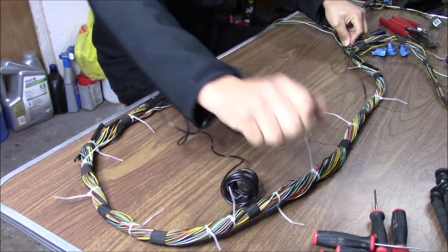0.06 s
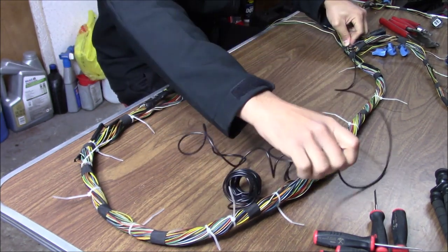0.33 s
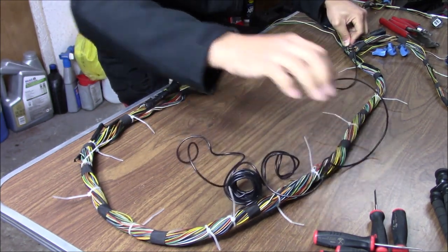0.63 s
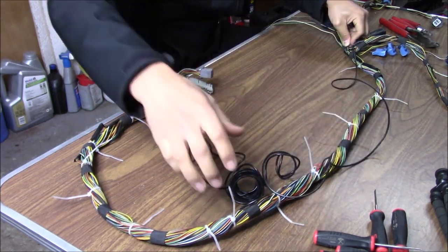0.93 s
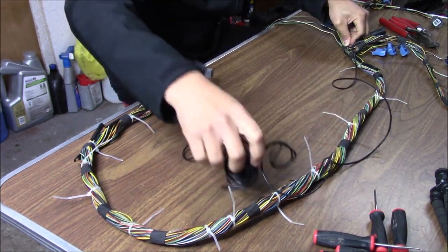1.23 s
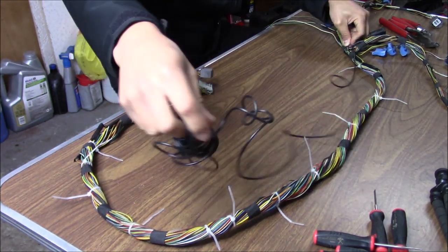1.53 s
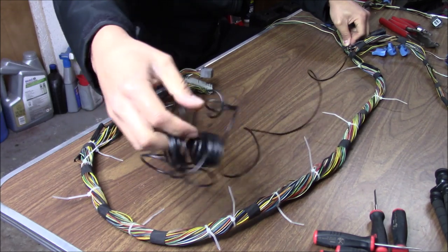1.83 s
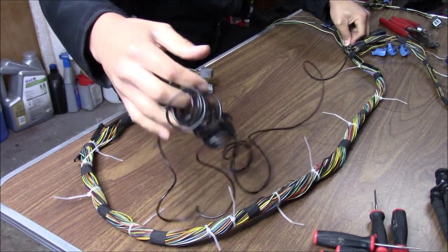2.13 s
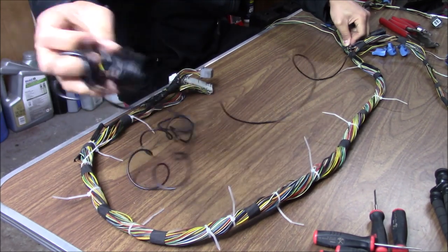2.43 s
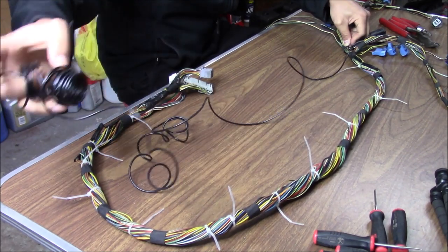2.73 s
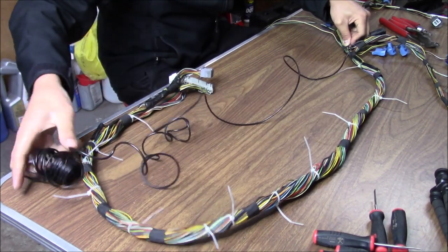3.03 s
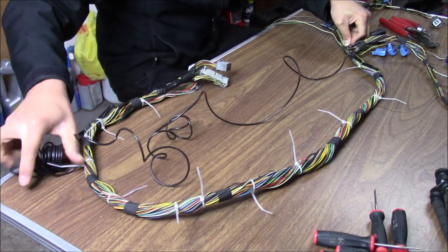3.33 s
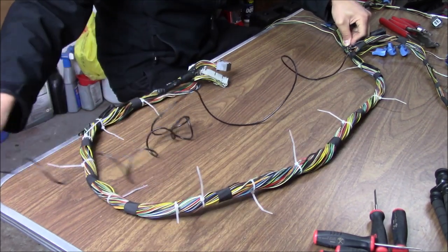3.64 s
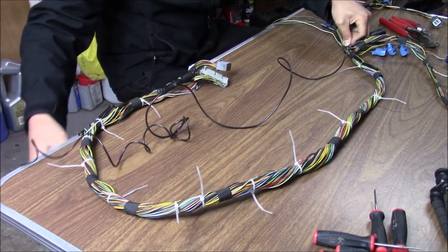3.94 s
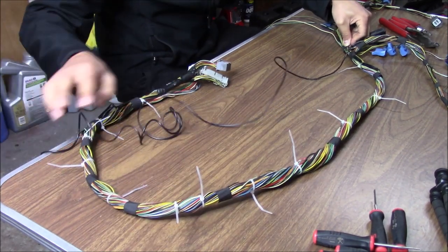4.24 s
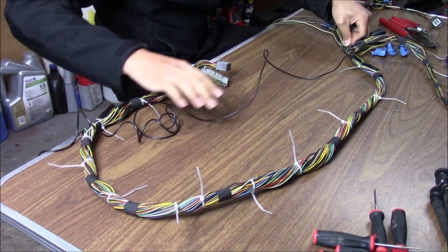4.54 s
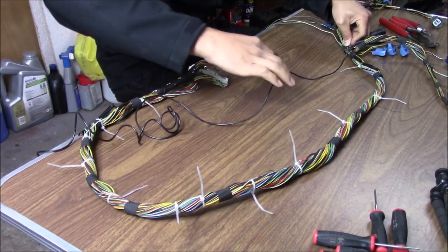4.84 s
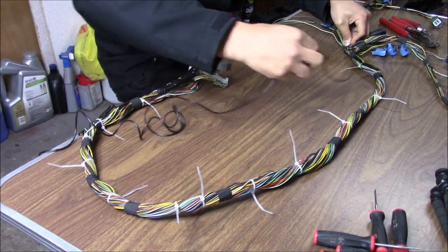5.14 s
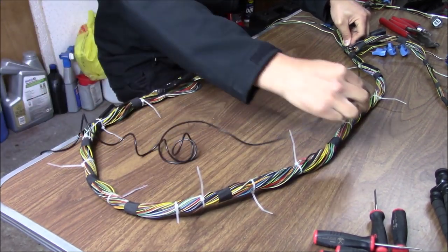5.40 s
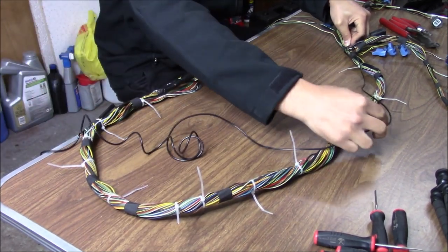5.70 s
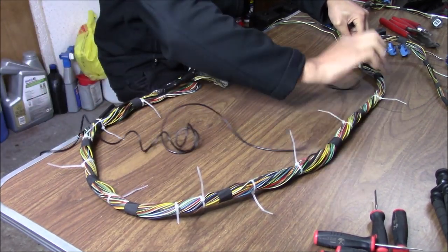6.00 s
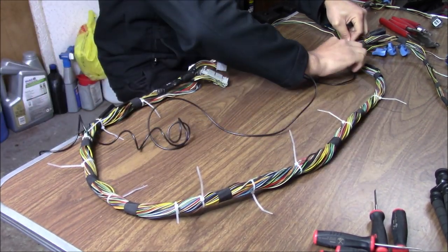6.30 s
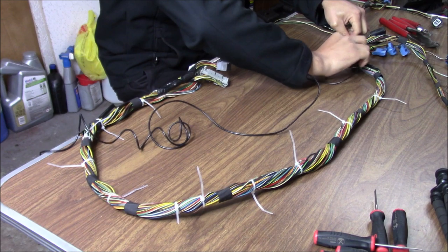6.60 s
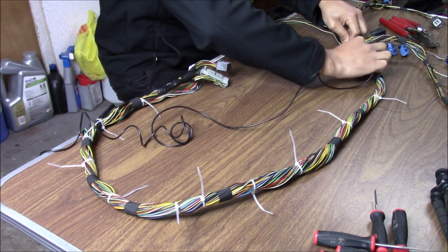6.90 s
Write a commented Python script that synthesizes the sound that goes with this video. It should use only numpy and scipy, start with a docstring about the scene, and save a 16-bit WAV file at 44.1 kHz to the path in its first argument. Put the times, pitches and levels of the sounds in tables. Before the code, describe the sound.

In a small, quiet workshop, someone handles a coil of wire on a wooden tabletop. A quick whipping slap comes first, followed by a dull thump, scattered clicks and short rustling slides. Midway the coil drags and judders, then clinks brightly against a hard object. Softer wire ticks and jacket brushes fill the rest. The microphone picks up a little room reverberation, almost in mono.

```python
"""Coiled wire on a wooden table

Hands move a coil of insulated wire about a wiring harness in a small workshop. Its loops and free end
strike the tabletop and excite its modes; wire, coil and a jacket sleeve rub by stick-slip friction.
The coil knocks, drags over the harness and drops over the edge against something hard that clinks.
Table, reverberation and room tone are heard nearly in mono."""
import sys
import numpy as np
from scipy import signal
from scipy.fft import rfft, irfft
from scipy.io import wavfile

SR = 44100
rng = np.random.default_rng(int(sys.argv[2]) if len(sys.argv) > 2 else 0)


def dump(signal):
    """Clip the signal to [-1, 1] and save it as 16-bit WAV at the path in sys.argv[1]."""
    limited = np.clip(np.atleast_2d(signal).T, -1, 1)
    pcm = np.round(limited * 32767).astype(np.int16)
    wavfile.write(sys.argv[1], SR, pcm)


N = 311346

# modes of the tabletop: (frequency [Hz], relative level [dB], decay time T60 [s])
TABLETOP_MODES = [(210, 7, 0.14), (224.3, -17, 0.083), (366, 6, 0.38), (493.5, 4, 0.34), (621, 1, 0.35),
                  (700, -15.5, 0.063), (846, 8, 0.14), (1031, 2, 0.06)]


def amp(db):
    """Amplitude ratio of a level in decibels."""
    return 10 ** (np.asarray(db) / 20)


def unit(x):
    """Normalisation to rms 1."""
    return x / np.sqrt(np.mean(x ** 2) + 1e-20)


def read(points, hz):
    """Interpolation on a log-frequency axis."""
    f, value = np.transpose(points)
    return np.interp(np.log(hz + 1), np.log(f + 1), value)


def add(mix, s, sound):
    """Superposition of a stereo sound, starting at s seconds."""
    part = mix[:, max(round(s * SR), 0):][:, :sound.shape[1]]
    part += sound[:, :part.shape[1]]


def room_tone():
    """Stationary noise, partly coherent between left and right."""
    # noise spectrum: (frequency [Hz], relative level [dB])
    colour = [(12, -60.5), (20, -27.5), (86, -7.5), (177, -4), (255, -6), (277, -3), (542, -6.5),
              (1220, -12.5), (1370, -9), (1960, -16), (4670, -21), (5230, -22.5), (8890, -27.5),
              (12400, -32), (16000, -41)]
    # likeness of the channels: (frequency [Hz], correlation [0-1])
    coherence = [(25, 0.89), (100, 0.81), (1000, 0.56), (4000, 0.73), (9000, 0.94), (14000, 0.95)]
    hz = np.fft.rfftfreq(N, 1 / SR)
    left, independent = rfft(rng.standard_normal((2, N)))
    same = read(coherence, hz)
    right = same * left + np.sqrt(1 - same ** 2) * independent
    return amp(-56) * unit(irfft(np.array([left, right]) * amp(read(colour, hz)), N))


def room(size=26000):
    """Reverberation: dense reflections decay exponentially, each band at its own rate."""
    # reverberation time: (frequency [Hz], T60 [s])
    decay = [(150, 0.27), (400, 0.5), (1040, 0.41), (2760, 0.47), (7280, 0.4), (14000, .3)]
    # spectrum of the reflections: (frequency [Hz], gain [dB])
    colour = [(100, 6), (400, 3.5), (1500, 1.5), (4000, 3.5), (8000, -0.5), (11000, 0), (15000, -12.5)]
    # their stereo spread: (frequency [Hz], side over mid [dB])
    width = [(100, -27), (400, -34.5), (1200, -43), (2400, -21), (5000, -14), (9000, -10.5), (12000, -9.5)]
    hz, t, bands = signal.stft(rng.standard_normal((2, size)), SR, nperseg=256)
    t60 = read(decay, hz)[:, None]
    equal_energy = np.sqrt(np.log(1e6) / (t60 * SR))
    bands = bands * amp(read(colour, hz)[:, None] - 60 * t / t60) * equal_energy
    bands[1] *= amp(read(width, hz))[:, None]
    build_up = np.minimum(np.arange(size) / (0.0027 * SR), 1)
    mid, side = signal.istft(bands, SR, nperseg=256)[1][:, :size] * build_up
    return np.array([mid + side, mid - side])


def pulse(colour, bass_db=0, treble_db=0, bass_hz=600, treble_hz=3500, size=2048):
    """Minimum-phase contact pulse: heavier contacts carry more bass, harder ones more treble."""
    hz = np.fft.rfftfreq(size, 1 / SR)
    bass_shelf = bass_db / (1 + (hz / bass_hz) ** 4)
    treble_shelf = treble_db / (1 + (treble_hz / (hz + 1)) ** 4)
    db = read(colour, hz) + bass_shelf + treble_shelf
    log_gain = np.log(amp(np.r_[db, db[-2:0:-1]]))
    return np.fft.ifft(np.exp(np.conj(signal.hilbert(log_gain)))).real[:size // 2]


def strokes(rows, flatness, sag_db, jerk_db, jerk_hz=25):
    """Amplitude envelope of rubbing: flat-topped bells, sagging as the uneven hand eases its pressure."""
    t = np.arange(N) / SR
    level = np.zeros(N)
    for middle, length, db in rows:
        along = np.clip(2 * (t - middle) / length, -4, 4)
        level += np.exp(-abs(along) ** flatness) * amp(db - sag_db * along)
    knots = np.arange(400) / jerk_hz
    unevenness = np.interp(t, knots, rng.standard_normal(len(knots)))
    return level * amp(jerk_db * unevenness)


def friction(level, colour, slips_per_s, spread_db, wet_db):
    """Stick-slip friction: a Poisson stream of tiny clicks of uneven size, heard through the room."""
    sizes = amp(spread_db * np.minimum(rng.exponential(1, N), 4)) * rng.standard_normal(N)
    slips = unit(sizes * (rng.random(N) < slips_per_s / SR))
    path = amp(wet_db) * room()
    path[:, 0] += 1  # direct sound
    path = signal.fftconvolve(path, pulse(colour)[None], axes=1)
    return signal.fftconvolve((slips * level)[None], path / np.linalg.norm(path[0]), axes=1)[:, :N]


def struck(modes, ring_db, chatter_db, chatter_s, size=10000):
    """Impulse response of a body: a direct spike, damped modes and brief contact chatter."""
    t = np.arange(size) / SR
    ring = sum(amp(db) * 1e-3 ** (t / t60) * np.sin(2 * np.pi * (hz * t + rng.random()))
               for hz, db, t60 in modes)
    ring *= amp(ring_db) / np.linalg.norm(ring)
    chatter = rng.standard_normal(size) * np.exp(-t / chatter_s)
    chatter *= amp(chatter_db) / np.linalg.norm(chatter)
    return (t == 0) + ring + chatter


def blows(rows, colour, modes, ring_db, chatter_db, chatter_s, wet_db, bass_hz, treble_hz):
    """Impacts by convolution: each pulse lands on another spot, with its own body and room response."""
    out = np.zeros((2, N))
    attack = SR // 40  # a blow's level is the rms of its first 25 ms
    for s, db, bass_db, treble_db in rows:
        body = struck(modes, ring_db, chatter_db, chatter_s)
        path = amp(wet_db) * room()
        add(path, 0, np.array([body, body]))
        push = pulse(colour, bass_db, treble_db, bass_hz, treble_hz)
        sound = signal.fftconvolve(path, push[None], axes=1)
        add(out, s, amp(db) * sound / np.sqrt(np.mean(sound[:, :attack] ** 2)))
    return out


def sleeve_brushes():
    """Cloth friction: a jacket sleeve hisses as the arm reaches."""
    # strokes: (centre time [s], duration [s], level [dB])
    rows = [(1.33, 0.14, -58.5), (1.54, 0.14, -53), (4.65, 0.1, -69.5), (5.22, 0.27, -60.5), (6.4, 1, -70)]
    # slip spectrum: (frequency [Hz], relative level [dB])
    colour = [(100, -2), (1000, 7), (4500, 0.5), (6500, -1), (9700, 1), (12500, -6), (16000, -19.5)]
    level = strokes(rows, flatness=3.4, sag_db=2.5, jerk_db=2.0)
    return friction(level, colour, slips_per_s=12000, spread_db=6.0, wet_db=-1.5)


def wire_slides():
    """Sliding friction: the insulation of loose loops sticks and slips on the wood."""
    # strokes: (centre time [s], duration [s], level [dB])
    rows = [(.28, 0.29, -48.5), (.405, 0.053, -38.5), (1.1, 0.38, -51), (1.555, 0.17, -44),
            (2.21, 0.3, -44.5), (3.22, 0.096, -53), (3.41, 0.073, -44), (3.61, 0.16, -42.5),
            (3.87, 0.084, -47), (4.01, 0.063, -46.5), (4.24, 0.082, -52), (4.99, 0.15, -53.5),
            (5.22, 0.21, -45), (6.01, 0.25, -45.5), (6.32, 0.82, -61.5), (6.78, 0.18, -54),
            (7.0, .08, -62.5)]
    # slip spectrum: (frequency [Hz], relative level [dB])
    colour = [(50, -69), (120, -7), (244, -23.5), (335, 0.5), (583, -1.5), (850, 2.5), (1300, -1),
              (2000, -4), (3200, -10.5), (4870, -19), (9020, -19.5), (12100, -25.5), (16000, -30)]
    level = strokes(rows, flatness=4.4, sag_db=0.9, jerk_db=1.35)
    return friction(level, colour, slips_per_s=6000, spread_db=1.0, wet_db=-3.0)


def coil_judders():
    """Slow stick-slip: the coil's turns judder on the tabletop, which resonates with a hollow boom."""
    # strokes: (centre time [s], duration [s], level [dB])
    rows = [(.562, .04, -50.5), (1.092, 0.053, -36), (1.352, 0.036, -49.5), (3.138, 0.11, -33),
            (3.405, 0.036, -42.5), (3.465, 0.047, -36)]
    # slip spectrum: (frequency [Hz], relative level [dB])
    colour = [(50, -45), (130, -19), (250, -11), (350, -0.5), (450, -2), (570, -3), (700, -14.5),
              (880, -13.5), (1200, -18), (3000, -28.5), (15000, -44)]
    level = strokes(rows, flatness=6, sag_db=1.5, jerk_db=0.7)
    return friction(level, colour, slips_per_s=800, spread_db=0.4, wet_db=-3.5)


def coil_drags():
    """Dense stick-slip: the whole coil scrapes over the harness."""
    # strokes: (centre time [s], duration [s], level [dB])
    rows = [(3.032, 0.057, -29.5), (3.105, 0.093, -33.5)]
    # slip spectrum: (frequency [Hz], relative level [dB])
    colour = [(60, -37), (110, -33), (185, -10), (400, -5.5), (721, 0.5), (1300, -7), (2200, -12),
              (3700, -20), (4770, -22.5), (8460, -21.5), (15000, -32.5)]
    level = strokes(rows, flatness=3.7, sag_db=2.0, jerk_db=-1.9)
    return friction(level, colour, slips_per_s=6600, spread_db=1.5, wet_db=-5.5)


def coil_knocks():
    """Soft impacts: coil and hand drive the tabletop mainly at low frequencies."""
    # impacts: (time [s], level [dB], bass shelf [dB], treble shelf [dB])
    rows = [(.5325, -43, 6.5, 4), (1.0344, -40.5, 10, 8), (1.0535, -25, 14, 2), (1.0565, -26.5, 10, -2),
            (3.4188, -31, -15.5, -4), (3.426, -28.5, 5.5, 0), (5.336, -49.5, -9, -16),
            (5.387, -47.5, -10.5, -30), (5.504, -53.5, 6, -20), (6.5678, -37.5, 0, -0.5),
            (6.991, -52, 9, 5)]
    # pulse spectrum: (frequency [Hz], relative level [dB])
    colour = [(30, -28), (70, -41), (130, -8), (220, -6), (350, -2.5), (550, 1), (750, -1.5), (1000, -5.5),
              (1500, -9.5), (3000, -24.5), (6000, -27), (14000, -39)]
    return blows(rows, colour, TABLETOP_MODES, ring_db=-8.5, chatter_db=5.0, chatter_s=0.0099,
                 wet_db=0.5, bass_hz=430, treble_hz=1500)


def edge_clinks():
    """Inharmonic ringing: the coil strikes a hard object at the table's edge."""
    # impacts: (time [s], level [dB], bass shelf [dB], treble shelf [dB])
    rows = [(3.7354, -37, 8.5, -15), (3.9704, -46, -4, -15), (4.0301, -45.5, -14, -9),
            (4.0574, -19.5, 6, -3)]
    # pulse spectrum: (frequency [Hz], relative level [dB])
    colour = [(30, -29), (80, -44), (200, -15), (380, -7.5), (570, -1), (1000, -5), (1600, 0.5), (2200, -5),
              (3000, -7), (4500, -10), (6700, -6.5), (9000, -7), (11500, -12), (15000, -7)]
    # modes of the object: (frequency [Hz], relative level [dB], decay time T60 [s])
    modes = [(694, -15, 0.19), (1107, 5, 0.1), (1420, 6, 0.087), (1635, 6, 0.24), (2000, 1.5, 0.47),
             (2980, 29, 0.022), (3450, -6, 1), (4420, 10, 0.22), (5830, -12, .2), (6900, 17, 0.11),
             (6670, 2, 0.39), (8280, -17, .25), (9300, -5, 0.26), (9700, 1, .1), (12500, -10, .08)]
    return blows(rows, colour, modes, ring_db=-2.0, chatter_db=4.5, chatter_s=0.0059,
                 wet_db=5.5, bass_hz=700, treble_hz=8000)


def wire_taps():
    """Light impacts: loose loops weakly excite the tabletop's modes."""
    # impacts: (time [s], level [dB], bass shelf [dB], treble shelf [dB])
    rows = [(.4261, -36.5, -0.5, 4), (1.0701, -35, -13, 9.5), (1.1759, -46.5, -5, -3),
            (1.7574, -30.5, 3, 10.5), (1.9866, -38.5, 7, -4), (2.0331, -27, 3, 6.5), (2.1051, -31, 0, 0.5),
            (2.1552, -23.5, 4.5, 12), (2.6299, -61.5, -4, 28), (2.7712, -64.5, -0.5, 16),
            (2.9126, -43.5, 9.5, 0.5), (2.9414, -34.5, -9, 1), (3.0012, -35.5, 1, -10),
            (3.2851, -46.5, 5, -9), (3.31, -42, -3, -5), (3.371, -51, 1, 5), (3.6551, -48, 12, 7),
            (4.2348, -40.5, 6.5, -1.5), (4.9831, -38.5, 3, -27), (5.0373, -44.5, 3, -1),
            (5.52, -40.5, 1.5, 2.5), (5.7046, -35, -3, 2), (5.7748, -45.5, 12, 9.5),
            (5.8504, -46.5, -6, 9.5), (5.886, -36, 2.5, 5), (6.7491, -44, 5, 1), (6.8124, -45.5, 5.5, -18)]
    # pulse spectrum: (frequency [Hz], relative level [dB])
    colour = [(30, -42), (80, -26.5), (150, -9), (300, -3), (500, 3), (900, 1.5), (1600, -0.5), (2800, -4),
              (4700, -13.5), (7000, -14), (10000, -16), (13000, -24), (15500, -30)]
    return blows(rows, colour, TABLETOP_MODES, ring_db=-14.0, chatter_db=0.0, chatter_s=0.0029,
                 wet_db=1.0, bass_hz=810, treble_hz=4200)


def wire_slaps():
    """Short contact gives a broad spectrum: the wire's free end whips the table."""
    # impacts: (time [s], level [dB], bass shelf [dB], treble shelf [dB])
    rows = [(.0669, -26, 0, 0.5), (.0781, -16.5, -1, 5), (.1191, -29, -3, -9), (.1976, -33, 1, -2),
            (4.9701, -47, 6, 5.5)]
    # pulse spectrum: (frequency [Hz], relative level [dB])
    colour = [(30, -42.5), (80, -23.5), (170, -8.5), (350, -0.5), (850, -1), (1350, 0.5), (2300, -11.5),
              (3200, -8.5), (5000, -12.5), (9500, -8), (10700, -13), (12300, -11), (13600, -13.5),
              (16000, -25)]
    return blows(rows, colour, TABLETOP_MODES, ring_db=-12.5, chatter_db=7, chatter_s=0.0016,
                 wet_db=6.5, bass_hz=703, treble_hz=5444)


def scene():
    """Superposition of impacts, friction and room tone."""
    impacts = wire_slaps() + wire_taps() + coil_knocks() + edge_clinks()
    rubbing = wire_slides() + coil_drags() + coil_judders() + sleeve_brushes()
    return impacts + rubbing + room_tone()


def record(dry):
    """Hard clipping at full scale, then band limiting with a gentle bass cut and a steep treble edge."""
    low_hz, high_hz = 40, 16300
    highpass = signal.butter(1, low_hz, "highpass", fs=SR, output="sos")
    lowpass = signal.firwin(255, high_hz, window=("kaiser", 8), fs=SR)
    clipped = np.clip(dry, -1, 1)
    return signal.oaconvolve(signal.sosfilt(highpass, clipped), lowpass[None], "same")


dry = scene()
out = record(dry)
dump(out)
```